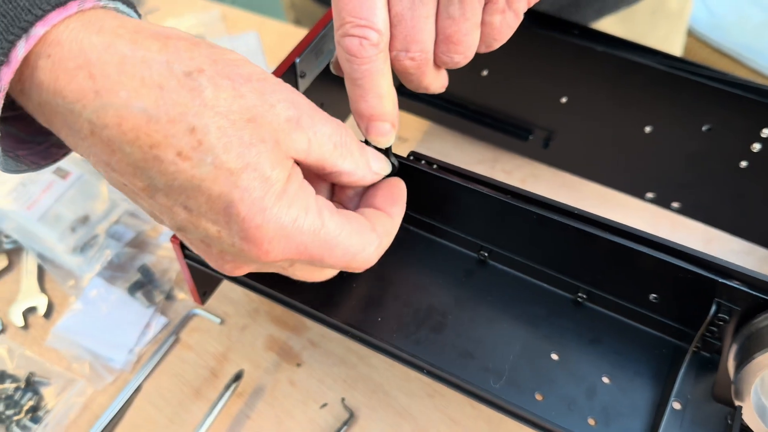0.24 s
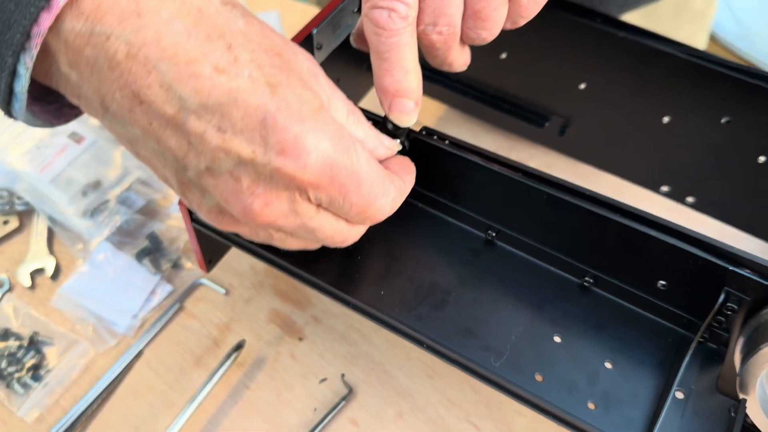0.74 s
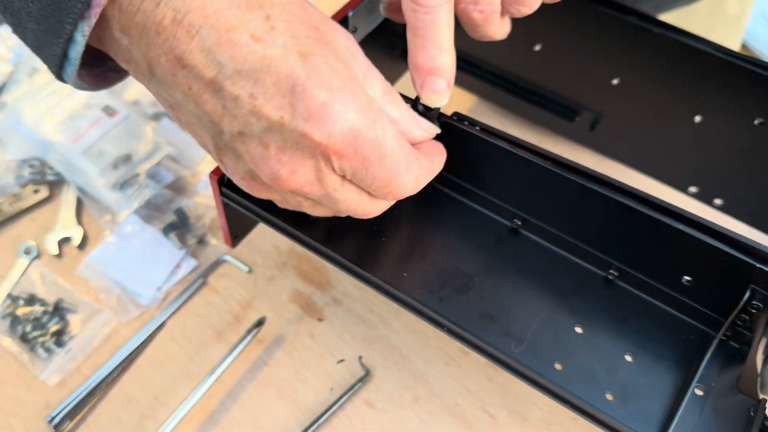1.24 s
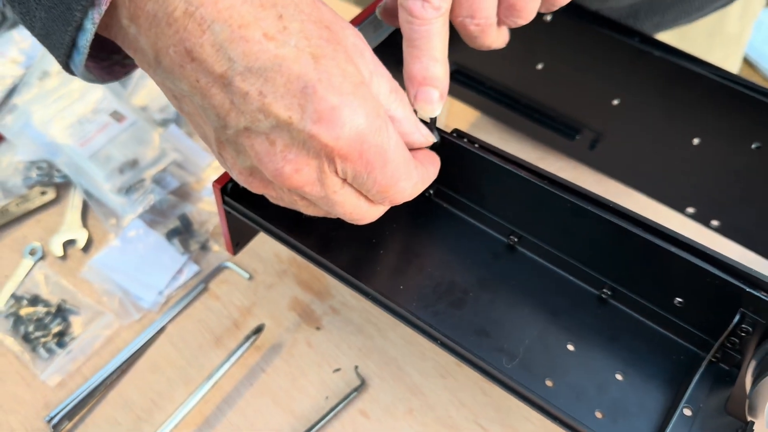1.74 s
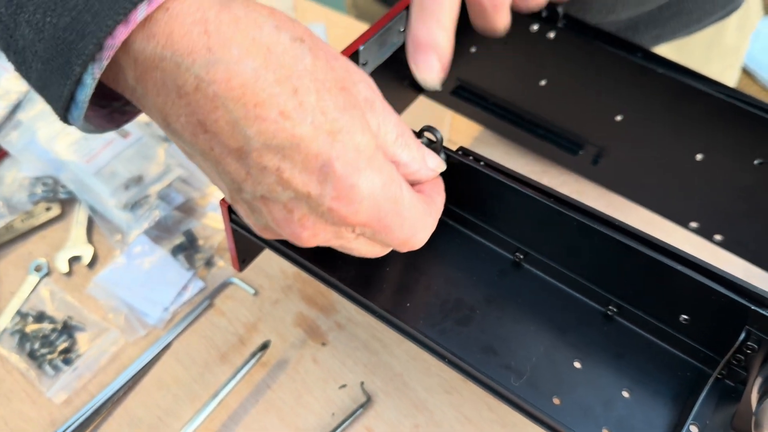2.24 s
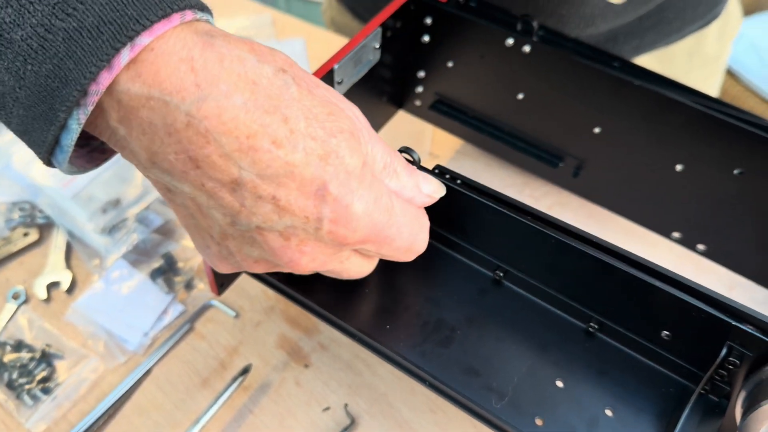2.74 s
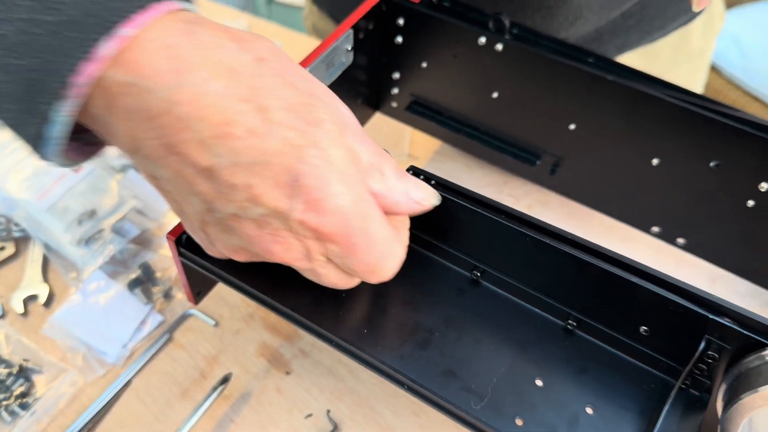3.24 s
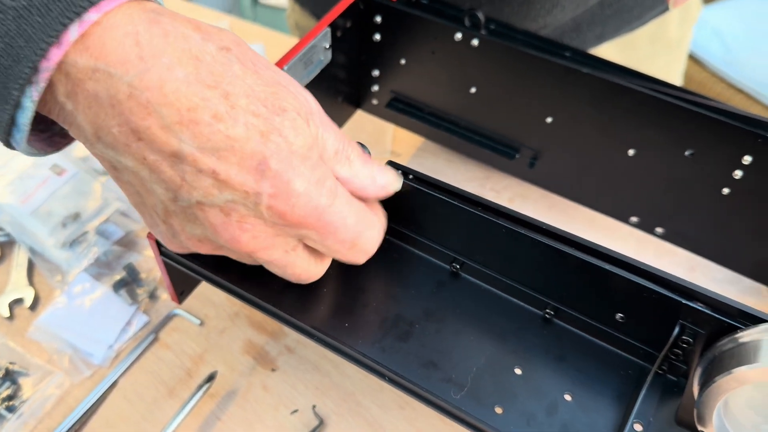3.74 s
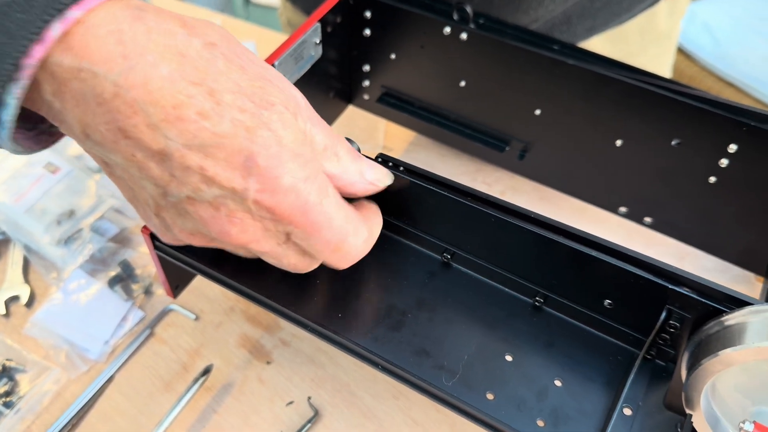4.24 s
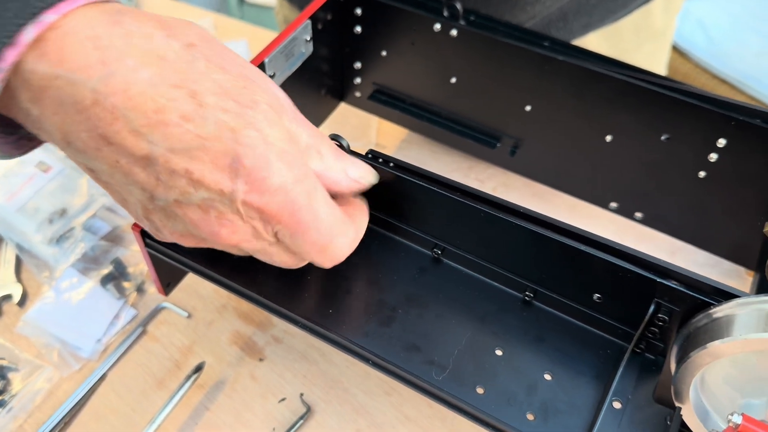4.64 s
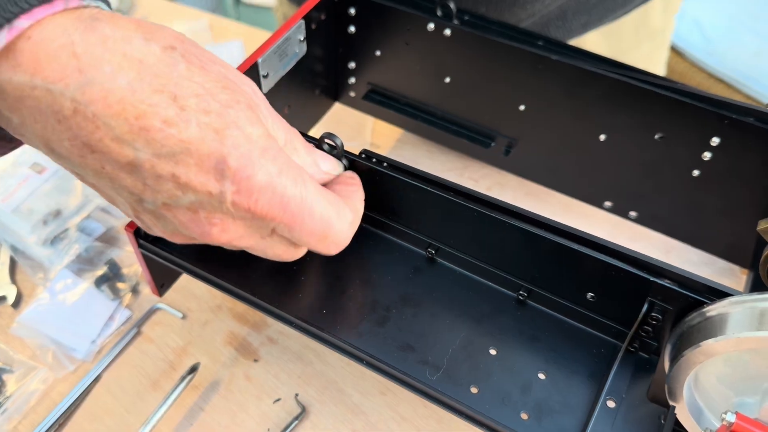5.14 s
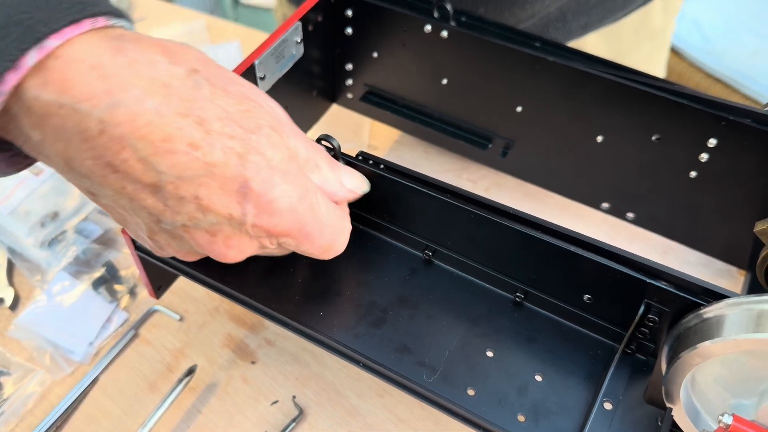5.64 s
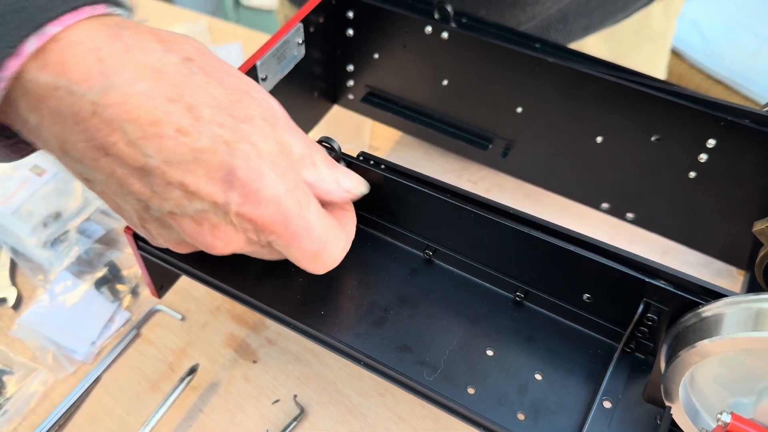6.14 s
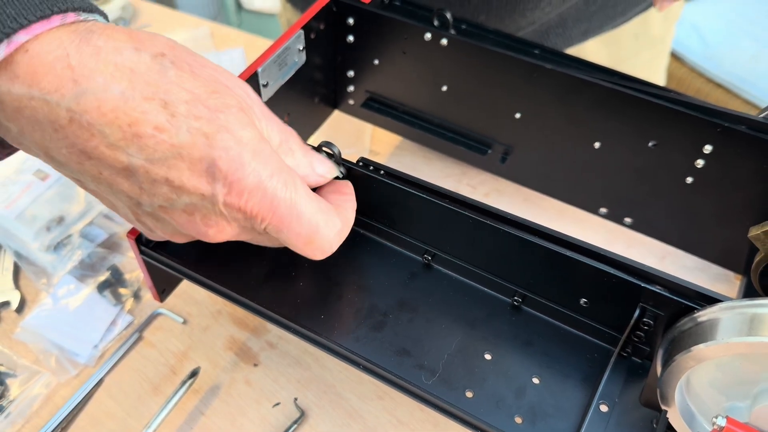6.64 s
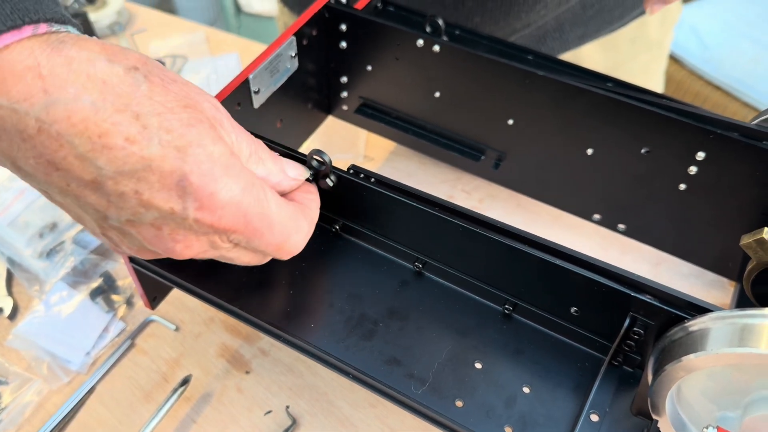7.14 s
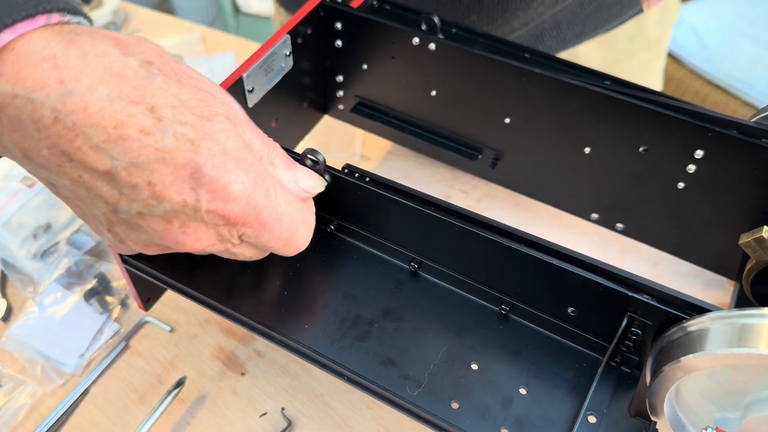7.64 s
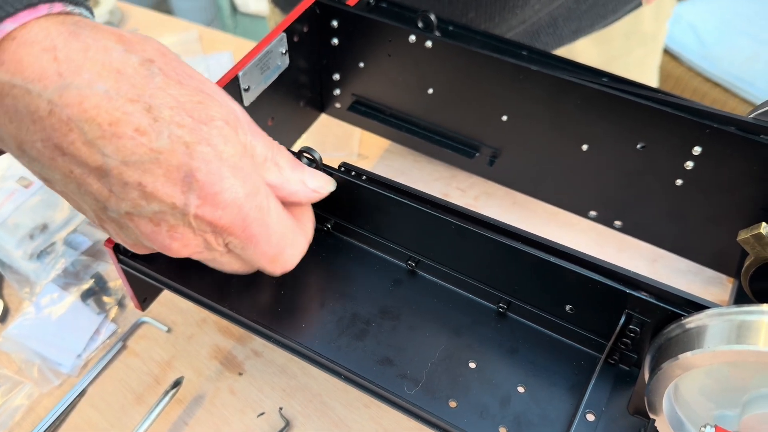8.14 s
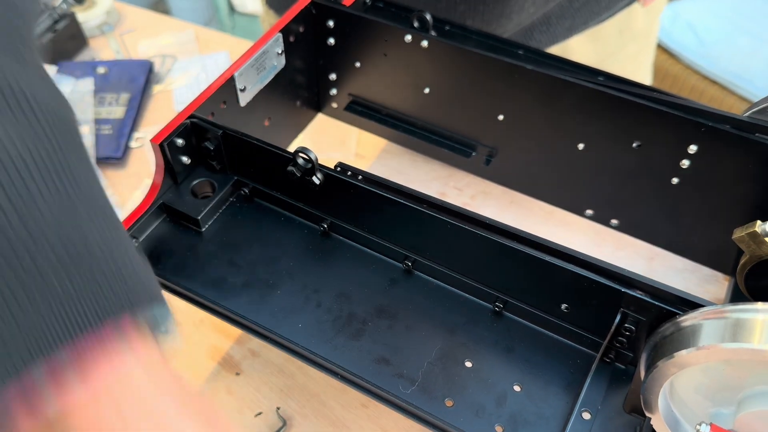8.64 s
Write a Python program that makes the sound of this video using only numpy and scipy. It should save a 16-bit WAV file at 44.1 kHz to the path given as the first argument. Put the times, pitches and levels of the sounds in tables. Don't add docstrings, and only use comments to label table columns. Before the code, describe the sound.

Fingers turn a small nut on a sheet-steel tray, irregular light metallic clicks and scrapes, quieting before a soft low bump and ticks.

```python
import sys
import numpy as np
from scipy import signal
from scipy.fft import rfft, irfft
from scipy.io import wavfile
from scipy.ndimage import uniform_filter1d

SR = 44100
rng = np.random.default_rng(int(sys.argv[2]) if len(sys.argv) > 2 else 0)


def int16_out(signal):
    q = np.round(np.clip(np.atleast_2d(signal).T, -1, 1) * 32767)
    wavfile.write(sys.argv[1], SR, q.astype(np.int16))


def magnitude_from_level(level_db):
    exponent = np.asarray(level_db, float) / 20
    return 10 ** exponent


N = 392798
HZ = np.fft.rfftfreq(N, 1 / SR)

# start_s [s], level_db near 2 kHz [dB peak], low_ring_db [dB],
# hardness_db 2.5-8 kHz [dB], tick_db [dB]
CLICKS = [(2.1121, -24, -14, -0.5, -2), (2.177, -29, -16, 4, -2.5), (2.366, -39, -6, -8.5, -12.5),
          (2.589, -30.5, -21, 1, -12.5), (2.8807, -39.5, -10, -0.5, -8.5),
          (3.2977, -29.5, -18, 7, -5.5), (3.5264, -40, -7, 7.5, -11),
          (3.7242, -36.5, -14.5, 0.5, -4.5), (3.7973, -36.5, -17, 3, -3.5),
          (3.8439, -29.5, -13.5, 1.5, -11), (4.4805, -23.5, -10.5, 6, -4.5),
          (4.577, -37.5, -8, 5, -1.5), (4.6804, -35, -10.5, 6.5, -5), (4.8277, -46.5, -11, -9, -27),
          (4.9559, -40.5, -14, 4.5, -10),
          (5.0485, -36, -17, -0.5, -4), (5.0831, -26.5, -13, 6, -3.5),
                      (5.2163, -42, -9, 8.5, 2.5), (5.334, -44, -27, -3, 4.5),
                      (5.4525, -20, -27, -13.5, -25), (5.674, -42.5, -13, -1, -2),
                      (5.8295, -23, -16.5, -2.5, -14), (6.0864, -39.5, -13.5, 4, -6),
                      (6.1938, -27.5, -22, -5, -4.5), (6.3524, -26, -8.5, 1.5, -7),
                      (6.4825, -41.5, -23, -1, -8), (6.6507, -24.5, -35, -2, -13.5),
                      (6.7849, -40.5, -7, 3, 9), (7.8603, -38, -9.5, -0.5, 2.5), (7.9827, -49, -9, 13, -7)]
# start_s [s], level_db [dB peak], hardness_db [dB], low_ring_db [dB]
KNOCKS = [(0.5323, -37.5, -5, -12), (0.9733, -35, -8, -13.5), (1.107, -53, 0, -8),
          (1.1368, -30, -2.5, -8.5), (1.1942, -36, -1.5, -5), (2.2781, -43.5, -11.5, -17),
          (2.5545, -32.5, -14, -10), (2.6308, -39.5, -2, -11), (2.6829, -39.5, 0, -9.5),
          (2.9379, -49.5, 4, -10), (3.2244, -38.5, -3.5, -26), (3.3986, -29, 1, -12),
          (3.4301, -36.5, -20, -9), (3.9944, -44, -2, -6), (4.0384, -44, -9, -9.5),
          (4.0604, -35.5, 3, -13.5), (4.2771, -36.5, -3, -12), (4.4566, -35, 0, -31),
          (4.668, -38.5, -3.5, -9.5), (4.9356, -51.5, -29, -18), (5.4234, -46, -5.5, -33),
          (5.5094, -29, -5.5, -11.5), (5.5349, -23.5, -1.5, -15.5), (5.7009, -39.5, 4, -26),
          (5.8953, -50.5, -14, -3), (6.0268, -48, 3.5, -35), (6.2899, -38.5, -3, -10.5),
          (6.6227, -32, 7.5, -11.5), (6.7494, -46, -1, -22), (7.4802, -60, -1, -19), (4.4846, -33, 1, -16),
          (4.4885, -33, -13, -14), (5.4483, -21.5, -17.5, -22), (5.4655, -49, -10, -10),
          (5.545, -34, -7.5, -18.5), (6.1967, -25.5, -10.5, -7), (6.4925, -40.5, -3, -18),
          (6.615, -42, -8, -18), (4.689, -45, -18, -9.5), (4.462, -34, -15, -19.5)]
# start_s [s], level_db [dB peak], hardness_db [dB]
NUDGES = [(1.162, -36.5, -25), (1.6721, -51, 3), (2.0565, -60, -24.5), (2.079, -54, -18),
          (2.5082, -47, -16), (2.7234, -44.5, -13), (3.1459, -57.5, -19), (3.1642, -55.5, -15),
          (3.1994, -47.5, -8), (3.239, -38, -30), (3.382, -51, -12), (3.673, -55.5, -24),
          (3.7055, -58, -17), (3.777, -51, -14), (3.966, -49, -16), (4.1795, -52, 5), (4.315, -44, -27),
          (4.4335, -43, -7), (5.3458, -45.5, 4), (5.9695, -43.5, -3.5), (6.461, -59, -40.5),
          (7.015, -60, -31.5), (7.118, -51.5, -21), (7.1811, -49.5, 2), (7.3045, -59, -15),
          (7.5953, -57, -8), (7.839, -61, -19), (7.9368, -51, 0), (8.127, -64, -25), (8.269, -59, -25.5),
          (6.858, -56.5, 1), (6.93, -68, -6), (6.9435, -71, -1), (6.986, -70, -8), (7.3805, -71, 6),
          (7.4065, -69, -2), (7.5277, -69, -8), (7.546, -64, -13), (7.576, -58.5, -6), (7.62, -59.5, 7),
          (7.705, -57, -10), (7.773, -65.5, -10), (8.188, -76, -8), (8.2206, -70, -8), (8.333, -64, 1)]
# start_s [s], length_s [s], level_db [dB peak], hardness_db
# [dB], tick_db [dB]
GRINDS = [(2.11, 0.071, -58.5, -11, -24), (2.156, 0.028, -25.5, -16, -33), (2.541, 0.021, -30, -8, -20),
          (3.391, 0.068, -40.5, -0.5, -37), (3.794, 0.035, -34.5, -3.5, -21), (4.06, 0.028, -31, -7, -19.5),
          (4.475, 0.013, -36, 3, -28), (5.439, 0.022, -28, 8, -2.5), (5.531, 0.014, -32.5, 4, -8.5),
          (5.822, 0.013, -28, 3.5, -8), (6.189, 0.017, -30.5, 12.5, 3), (6.61, 0.026, -32, -6, -11),
          (0.521, 0.019, -53, -11, -25), (0.966, 0.014, -50, -11, -26), (1.085, 0.055, -51, 2, -30),
          (6.18, 0.025, -36, -5, -31)]
# start_s [s], length_s [s], level_db [dB peak], hardness_db [dB]
DRAGS = [(0.197, 0.014, -62.5, -17), (0.255, 0.086, -66.5, -8), (0.789, 0.076, -58, -6),
         (0.898, 0.095, -61.5, -21), (1.4, 0.08, -64.5, -17), (1.72, 0.19, -71.5, -33),
         (2.374, 0.12, -80.5, 18.5), (2.953, 0.31, -57.5, -9), (3.559, 0.023, -45.5, -3.5),
         (4.261, 0.047, -49, -4), (4.812, 0.051, -42, -3), (4.934, 0.06, -42, -3), (7.104, 0.2, -63, 5.5),
         (7.176, 0.051, -78, -5), (7.27, 0.073, -73, 18), (7.359, 0.093, -87, 25),
         (7.559, 0.099, -62.5, 10), (7.94, 0.058, -52.5, 5), (8.278, 0.16, -59.5, -0.5),
         (8.696, 0.17, -70.5, 18.5), (6.84, 0.058, -63, 4), (6.91, 0.23, -83, -12), (7.44, 0.091, -80, -7),
         (7.663, .16, -73, -5)]
# start_s [s], turning_effort_db [dB], weight_on_tray_db [dB]
HAND = [(0.0, -87.5, -98), (0.43, -82.5, -84), (1.13, -73, -59), (1.39, -92.5, -72.5), (2.06, -92.5, -74),
        (2.28, -107, -53.5), (2.54, -63, -56.5), (2.85, -80.5, -62.5), (3.41, -74, -57), (3.6, -71, -61),
        (3.98, -73.5, -61), (4.342, -78.5, -67), (5.54, -74.5, -58), (5.7, -67.5, -62),
        (6.58, -71.5, -57.5), (7.3, -79.5, -59.5), (7.83, -75, -59.5), (8.62, -76, -69.5)]
MODE_HZ = [497, 565, 966, 1104, 1138, 1268, 1438, 1508, 1650, 1740, 1846, 1890, 1912, 2018, 2070, 2165,
           2210, 2236, 2466, 2565, 2811, 3176, 3770, 3940, 4480, 4800, 5190, 6400]
# level_db [dB], t60_s [s]
MODE_RING = [(-27, 0.19), (-27.5, .14), (-28.5, 0.15), (-9, 0.3), (-10.5, 0.32), (-15, 0.18), (-25.5, 0.13),
             (-10, .2), (-7.5, 0.18), (-1, 0.051), (-10.5, 0.069), (-8.5, .1), (-9, 0.18), (3, .13),
             (-5.5, 0.14), (2.5, 0.049), (-5.5, .15), (-13, 0.072), (-18, 0.12), (-0.5, 0.29), (-5, 0.8),
             (-14, 0.17), (-8.5, 0.2), (-9.5, 0.12), (-11, .1), (-12, .12), (-9, .16), (-9.5, 0.068)]
# pitch_hz [Hz], level_db [dB], t60_s [s]
SHIMMER = [(353, -30, 0.081), (599, -22, 0.1), (716, -29, 0.14), (1443, -9, 0.063), (1908, -1.5, 0.1),
           (2710, -4.5, 0.089), (3280, -1.5, 0.18), (4115, -6.5, 0.35), (5070, -4.5, 0.12),
           (5860, -14.5, 0.1), (7150, 8.5, 0.018), (7130, -8.5, 0.33), (8740, 11, 0.038),
           (11100, -2.5, 0.078), (12100, 5.5, 0.0071), (14300, 4.5, 0.039), (14300, -4, 0.16),
           (16500, -17, 0.24)]
GROUP_EDGES_HZ = [1350, 2500, 8000]
# start_s [s], level_db [dB peak], pitch_hz [Hz], t60_s [s]
BUMPS = [
    (1.142, -51, 108.7, 0.56),
    (2.561, -42.5, 113, 0.16),
    (5.233, -51.5, 227, 0.27),
    (8.3, -49.5, 109, 0.41),
    (8.646, -39.5, 210, 0.033),
    (8.721, -36, 293, 0.058),
    (8.729, -38, 166, 0.2),
    (8.786, -38, 161.6, 0.23),
    (8.81, -59, 155, 0.12),
    (8.856, -50.5, 167, 0.43),
]
# start_s [s], level_db [dB peak], pitch_hz [Hz], t60_s [s]
TICKS = [(0.8, -59, 9800, .012), (1.195, -62, 6800, .015), (0.168, -64.5, 14000, 0.022),
         (7.6, -39, 2900, 0.015), (6.545, -65, 9000, 0.012), (8.64, -65, 1400, 0.02),
         (8.712, -39.5, 5800, 0.019), (10, -42.5, 7900, 0.1), (8.728, -46, 1410, 0.028),
         (8.773, -40, 2940, 0.022), (8.772, -32.5, 4500, 0.0079), (8.776, -52, 11000, 0.0072),
         (8.877, -51.5, 1030, 0.047), (8.873, -56.5, 3300, 0.2), (8.776, -52, 1900, 0.075),
         (10, -51, 1900, 0.094), (8.78, -56, 13500, .05), (8.715, -60, 13500, .05)]
# pitch_hz [Hz], width_hz [Hz], level_db [dB]
DRONE = [(112.4, 7.1, -7), (162.8, 7.8, -3.5), (230.94, 5.5, 5), (295, 290, -13.5), (492, 30, -18.5)]
# pitch_hz [Hz], level_db [dB per Hz]
SKIN_HISS = [(1470, -68), (2500, 5), (4970, -16), (6710, 0), (8840, -5), (15100, 1.5), (16100, 7.5),
             (16500, -23.5)]
# pitch_hz [Hz], level_db [dB per Hz]
FLOOR = [(12, -10), (20, 2), (71, 7), (156, -10), (230, -8.5), (281, -17.5), (794, -32.5), (1110, -33.5),
         (1470, -45), (2060, -36.5), (2370, -37.5), (4930, -46.5), (11800, -50.5), (14700, -31.5),
         (16500, -56.5)]
# pitch_hz [Hz], side_minus_mid_db [dB]
FLOOR_SIDE = [(30, -42), (60, -30), (150, -16), (300, -9), (1000, -3), (8000, 0), (13000, -8)]
# pitch_hz [Hz], left_lead_rad [rad]
PORT_PHASE = [(0, 0), (500, -0.9), (950, -0.9), (2070, 1.0), (2840, 0.9), (4050, 7.9), (4480, 12.2),
              (5170, 15.3), (5770, 10.8), (6370, 12.0), (6890, 15.8), (7410, 15.3), (10200, 14.5),
              (12800, 13.3), (16400, 12.4)]
# pitch_hz [Hz], left_minus_right_db [dB]
PORT_BALANCE = [(60, 0.0), (110, -0.5), (200, 0.0), (380, 0.5), (700, -2.5), (1290, -4.5), (2380, -4.0),
                (4400, -2.0), (8120, -0.5), (15000, 0.0)]

RING = 13000
SWELL_S, GRIP_T60_S, GRIP_SPREAD_DB = 0.0072, 0.21, 2.5
CRACK_DB, CRACK_SHARE = 2, 0.17
SPOT_DB = 3
TWIN = 3
UPPER_FROM_HZ, BODY_TOP_HZ = 1150, 8000
LOW_TRIM_DB, HARD_TRIM_DB = -3, -2
NUDGE_LOW_DB, GRIND_LOW_DB, DRAG_LOW_DB = -10, -12, -8.5
KNOCK_TICK_DB, NUDGE_TICK_DB, DRAG_TICK_DB = -37, -9.5, -6.5
SEATED_S, SEATED_LOW_DB = 7.05, 6.5
LEAD_S = 0.01
RUB_SPOTS, SPOT_HOLD = 8, 2500
FLOOR_DB = -61.5
ROOM_T60_S, ROOM_DB, ROOM_TOP_HZ = 0.25, -10.5, 7400


def unit(x):
    return x / np.sqrt(np.mean(x ** 2))


def over_hz(points, hz):
    at, value = np.transpose(points)
    return np.interp(np.log(hz + 1), np.log(at + 1), value)


def shaped_noise(gain):
    return irfft(rfft(rng.standard_normal(N)) * gain, N)


def fade(t60, size):
    return np.exp(-np.log(1000) * np.arange(size) / SR / max(t60, 0.005))


def butter(order, hz, kind, x):
    return signal.sosfilt(signal.butter(order, hz, kind, fs=SR, output="sos"), x)


def walk(rate):
    k = int(SR / rate)
    held = np.repeat(rng.standard_normal(N // k + 1), k)
    return 0.4 * uniform_filter1d(uniform_filter1d(held, k), k)[:N]


def add(track, sound, s):
    i = max(int(s * SR), 0)
    track[i:i + len(sound)] += sound[:N - i]


def slips(tray):
    def seated(s):
        return SEATED_LOW_DB * (s > SEATED_S)

    out = np.zeros(N)
    scrapes = [(s, length, db, GRIND_LOW_DB, hard, tick) for s, length, db, hard, tick in GRINDS]
    for s, length, db, hard in DRAGS:
        scrapes.append((s, length, db, DRAG_LOW_DB + seated(s), hard, DRAG_TICK_DB + hard))
    for s, length, *levels in scrapes:
        chance = rng.random((2, 10000))[:, :int(length * SR)]
        swell = np.hanning(len(chance[0])) ** 0.76
        catches = (chance[0] - 0.5) * magnitude_from_level(-40 * chance[1]) * swell
        add(out, strike(tray, catches, *levels), s)

    sudden = CLICKS
    sudden += [(s, db, low, hard, KNOCK_TICK_DB) for s, db, hard, low in KNOCKS]
    sudden += [(s, db, NUDGE_LOW_DB + seated(s), hard, NUDGE_TICK_DB + hard) for s, db, hard in NUDGES]
    for s, *levels in sorted(sudden):
        add(out, strike(tray, chatter(rng.random((3, 1800))), *levels), s - LEAD_S)
    return out


def chatter(chance):
    t = np.arange(len(chance[0])) / SR - LEAD_S
    shape = np.where(t < 0, np.exp(t / 0.0034), np.exp(-t / 0.0064))
    hits = chance[0] < 0.03
    blows = magnitude_from_level(-7.0) * shape * hits * magnitude_from_level(-14 * chance[1]) * np.sign(chance[2] - 0.5)
    blows[int(LEAD_S * SR)] = 1
    return blows


def tray_rings():
    t, hz = np.arange(RING) / SR, np.fft.rfftfreq(2 * RING, 1 / SR)
    clear, bands, falls = [], [], []
    for f, (db, t60) in zip(MODE_HZ, MODE_RING):
        swell = 1 - (f < GROUP_EDGES_HZ[0]) * np.exp(-t / SWELL_S)
        clear.append(magnitude_from_level(db) * np.sin(2 * np.pi * f * t) * fade(t60, RING) * swell)
    for f, db, t60 in SHIMMER:
        band = np.exp(-(np.log(hz / f + 1e-9) / 0.14) ** 2)
        bands.append(unit(irfft(rfft(rng.standard_normal(2 * RING)) * band)))
        crack = magnitude_from_level(CRACK_DB) * fade(t60 * CRACK_SHARE, RING)
        falls.append(magnitude_from_level(db) * (fade(t60, RING) + crack))
    return np.array(clear), np.array(bands), np.array(falls)


def strike(tray, blows, db, low_db, hard_db, tick_db):
    clear, bands, falls = tray
    start = rng.integers(RING)
    rings = np.vstack([clear, bands[:, start:start + RING] * falls])
    group = np.digitize(MODE_HZ + [row[0] for row in SHIMMER], GROUP_EDGES_HZ)
    spot = magnitude_from_level(SPOT_DB * rng.standard_normal(len(rings))) * rng.choice([-1, 1], len(rings))
    spot[TWIN + 1] = spot[TWIN]
    ring = (spot * (group == np.arange(4)[:, None])) @ rings
    ring[1:] *= fade(GRIP_T60_S * magnitude_from_level(GRIP_SPREAD_DB * rng.standard_normal()), RING)
    ring[1:] = butter(4, UPPER_FROM_HZ, "high", ring[1:])
    ring[:3] = butter(4, BODY_TOP_HZ, "low", ring[:3])
    parts = signal.fftconvolve(ring, blows[None], axes=1)
    levels = magnitude_from_level(db + np.array([low_db + LOW_TRIM_DB, 0, hard_db + HARD_TRIM_DB, tick_db]))
    return levels / np.abs(parts).max(axis=1) @ parts


def hand(column):
    points = np.transpose(HAND)
    return np.interp(np.arange(N) / SR, points[0], points[column])


def rub(tray):
    effort = hand(column=1)
    burst = magnitude_from_level(4.2 * np.minimum(rng.exponential(size=N), 2.4))
    catches = rng.standard_normal(N) * burst * (rng.random(N) < 0.02)
    catches = unit(catches) * magnitude_from_level(effort + 5.8 * walk(18))
    spot = np.repeat(rng.integers(RUB_SPOTS, size=N // SPOT_HOLD + 1), SPOT_HOLD)[:N]
    ring = np.zeros(N)
    for k in range(RUB_SPOTS):
        body = strike(tray, np.ones(1), 0, -1.5, 0.42, -27.0)
        ring += signal.fftconvolve(catches * (spot == k), body / np.linalg.norm(body))[:N]
    skin = unit(shaped_noise(magnitude_from_level(over_hz(SKIN_HISS, HZ))))
    return magnitude_from_level(-0.5) * ring + magnitude_from_level(effort - 8 + 4.7 * walk(62)) * skin


def bumps():
    out, t = np.zeros(N), np.arange(RING) / SR
    for s, db, hz, t60 in BUMPS + TICKS:
        edges = [0.29 * hz, min(1.94 * hz, 0.45 * SR)]
        rough = butter(2, edges, "band", rng.standard_normal(RING))
        tone = min(700 / hz, 1) * np.sin(2 * np.pi * hz * t)
        rise = np.minimum(t * hz / 1.94, 1)
        add(out, magnitude_from_level(db) * (tone + 0.5 * unit(rough)) * fade(t60, RING) * rise, s)
    return out


def drone():
    shape = sum(magnitude_from_level(db) / (1 + 1j * (HZ - hz) / (width / 2)) for hz, width, db in DRONE)
    mid, side = unit(shaped_noise(shape)), unit(shaped_noise(shape))
    press = magnitude_from_level(-7.5 + hand(column=2) + 1.5 * walk(22))
    return press * (mid + magnitude_from_level(-9) * side * np.array([[1], [-1]]))


def floor():
    mid_db = over_hz(FLOOR, HZ)
    side_points = [(hz, db + over_hz(FLOOR_SIDE, hz)) for hz, db in FLOOR]
    mid = shaped_noise(magnitude_from_level(mid_db))
    side = shaped_noise(magnitude_from_level(over_hz(side_points, HZ)))
    return magnitude_from_level(FLOOR_DB + 0.5 * walk(1.3)) * np.array([mid + side, mid - side]) / np.std(mid)


def room(near):
    walls = butter(2, ROOM_TOP_HZ, "low", rng.standard_normal((2, RING)))
    walls = walls * fade(ROOM_T60_S, RING)
    return magnitude_from_level(ROOM_DB) * signal.fftconvolve(near[None], walls / np.linalg.norm(walls[0]), axes=1)[:, :N]


def scene():
    tray = tray_rings()
    near = butter(2, 300, "high", slips(tray) + rub(tray))
    at, phase = np.transpose(PORT_PHASE)
    lead = magnitude_from_level(over_hz(PORT_BALANCE, HZ) / 2) * np.exp(0.5j * np.interp(HZ, at, phase))
    ports = irfft(rfft(near + room(near)) * np.array([lead, 1 / lead]), N)
    return ports + bumps() + drone() + floor()


def top_cut(x):
    return signal.sosfilt(signal.butter(12, 16830, fs=SR, output="sos"), x)


def record(dry):
    mix = signal.sosfilt(signal.ellip(6, 0.3, 50, 16000, fs=SR, output="sos"), dry)
    return top_cut(mix)


dry = scene()
out = record(dry)
int16_out(out)
```